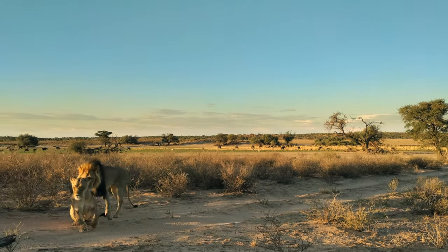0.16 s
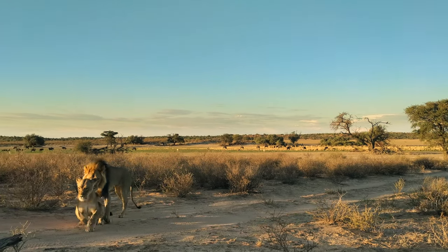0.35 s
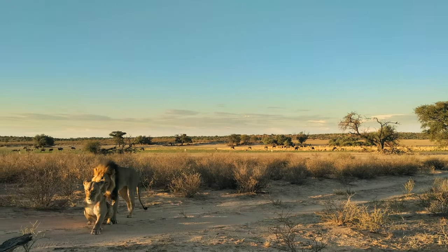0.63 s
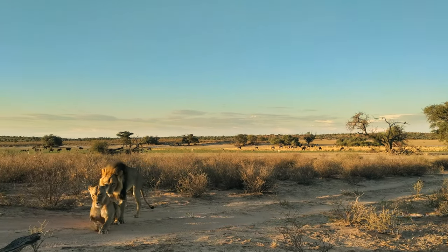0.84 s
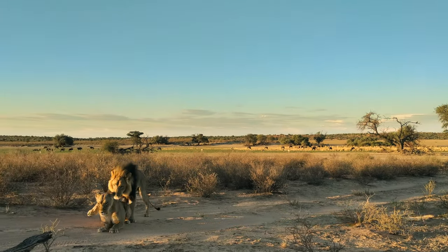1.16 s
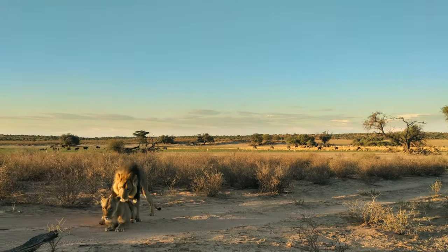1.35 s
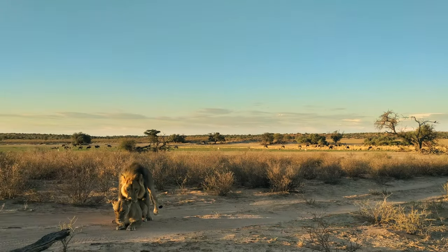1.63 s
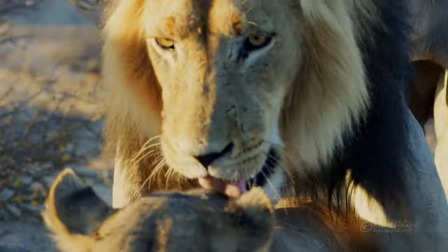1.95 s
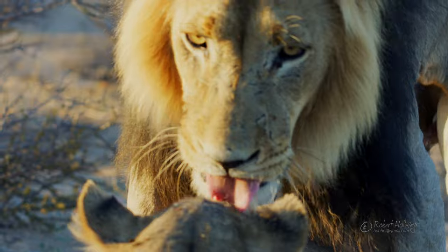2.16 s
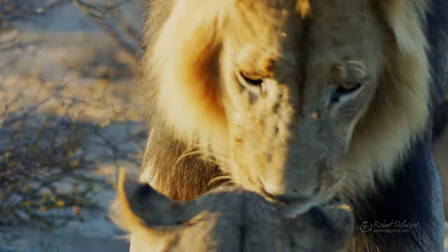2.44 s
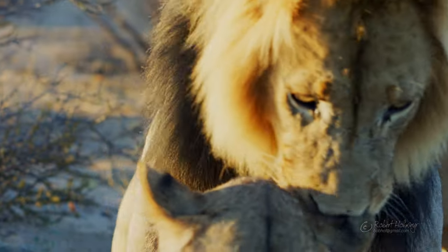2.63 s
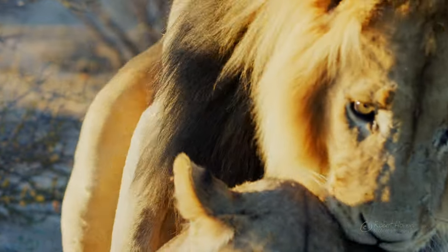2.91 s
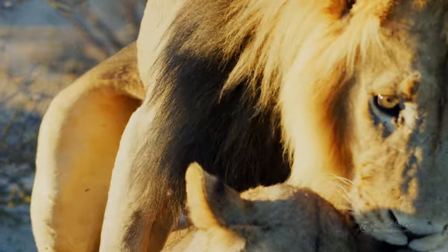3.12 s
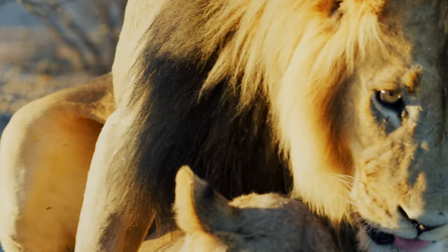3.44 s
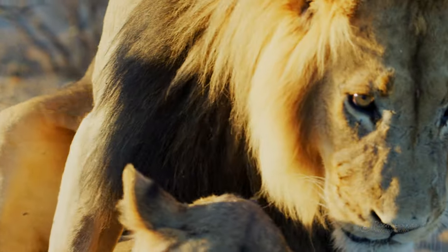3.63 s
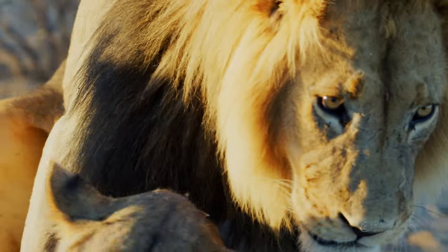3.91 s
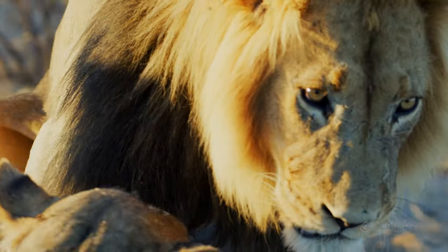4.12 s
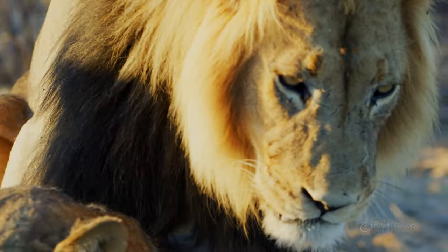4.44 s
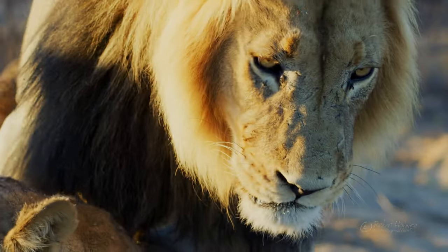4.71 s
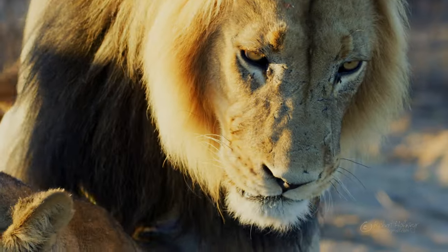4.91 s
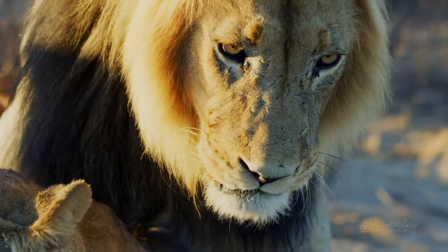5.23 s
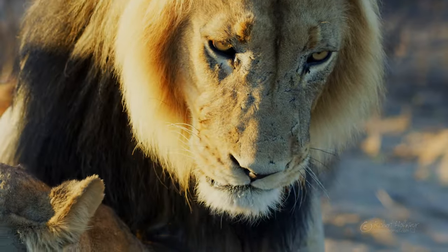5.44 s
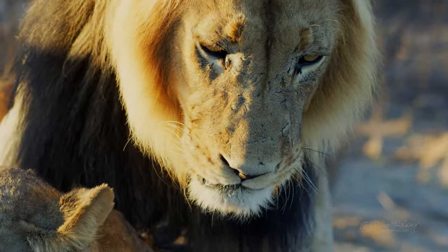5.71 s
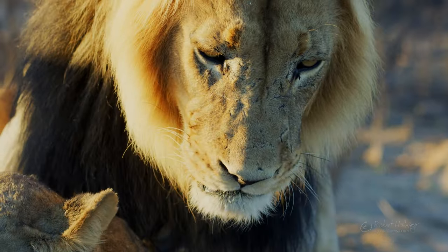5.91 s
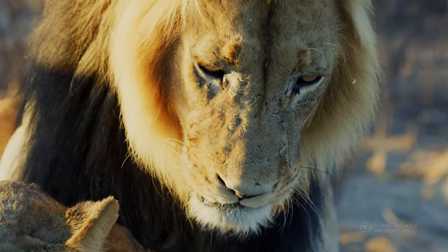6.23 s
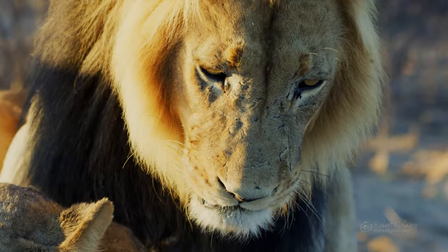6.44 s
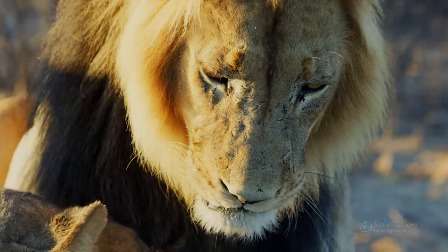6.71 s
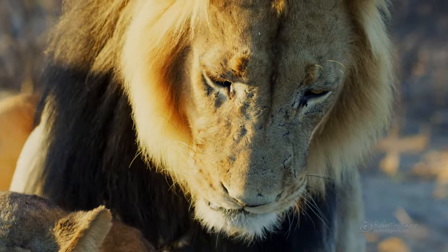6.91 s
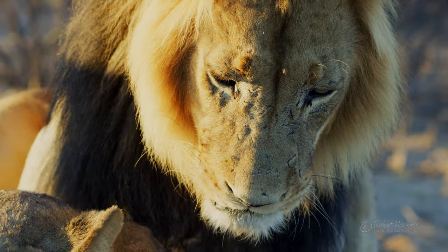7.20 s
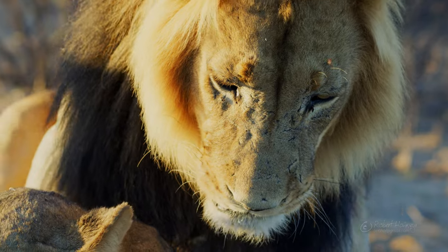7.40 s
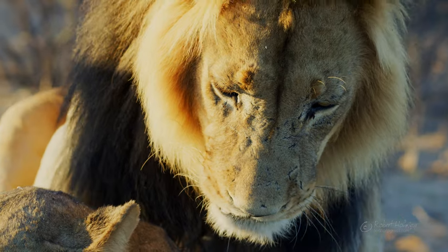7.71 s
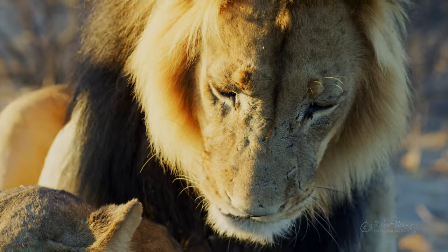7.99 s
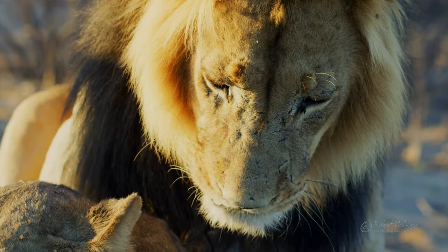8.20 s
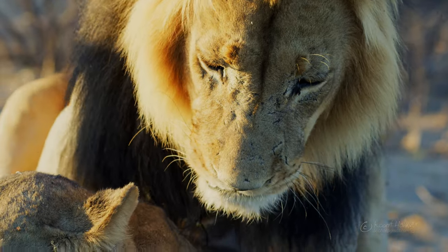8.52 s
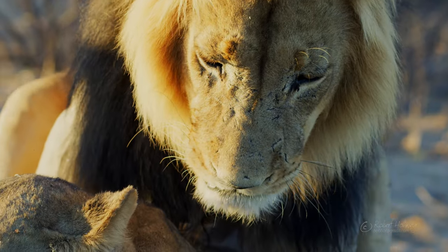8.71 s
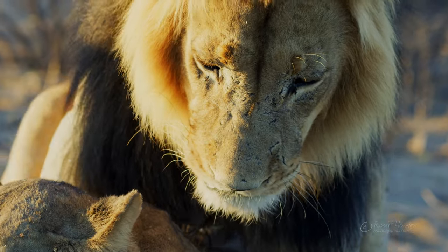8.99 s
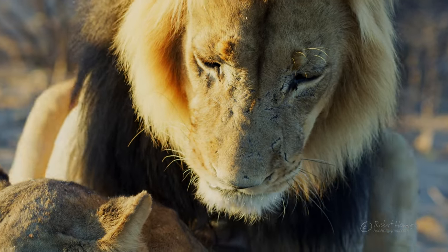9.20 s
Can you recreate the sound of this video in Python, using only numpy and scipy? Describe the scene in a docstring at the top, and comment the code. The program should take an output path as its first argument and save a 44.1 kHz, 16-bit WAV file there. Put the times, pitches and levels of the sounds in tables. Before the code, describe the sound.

A close stereo pickup of a lion growling in open scrub. Quiet rumble, a croaking rattle and small snaps lead in; then the growl starts with a nasal snarl and continues as a deep, rough, uneven purr-like rumble to the end. Quick bird chirps, falling whistles and harsh little notes scatter around it, with fainter chatter farther off and very soft air hiss.

```python
"""Lion growl and bird flock

A lion growls in dry open bush, a little right of centre: throat pulses and breath ring through throat,
nose and open mouth, over a deep chest rumble of lumpy noise; its last phrase repeats as a loop.
A flock of small birds whistles (gliding sines) and rasps (shaken sines) nearby, with chatter farther off.
A frog-like rattle and a few ticks (clicks in resonances) open the scene; faint banded hiss lies under all."""
import sys
import numpy as np
from scipy import signal
from scipy.io import wavfile

SR = 44100
rng = np.random.default_rng(int(sys.argv[2]) if len(sys.argv) > 2 else 0)


def int16_out(signal):
    """Quantize to a 16-bit WAV file."""
    q = np.round(np.clip(np.atleast_2d(signal).T, -1, 1) * 32767)
    wavfile.write(sys.argv[1], SR, q.astype(np.int16))


N = 412335

# Hiss colour: f/Hz, relative level per Hz/dB
AIR_COLOUR = [(15, -35), (25, -0.5), (101, -1.5), (314, -13.5), (685, -23), (897, -16.5), (1710, -21),
              (2240, -23.5), (8150, -24.5), (9320, -29), (12200, -26), (15600, -36)]
AIR_DB = -59.5
# Stereo width of the hiss: f/Hz, left-right likeness/1
AIR_LIKENESS = [(60, 1), (600, 0.67), (3000, 0.65), (8000, 0.24), (10800, 0.46), (11100, 1)]
# Dry snaps: t/s, strength/dB
TICKS = [(0.537, -26), (0.617, -16), (0.694, -12.5), (0.765, -20.5)]
# Rings of a snap: f/Hz, width/Hz, level/dB
TICK_MODES = [(1050, 430, -0.5), (2080, 450, 0.5), (5560, 570, -6.5)]
# Rings of the rattle: f/Hz, width/Hz, relative level/dB
RATTLE_MODES = [(1010, 210, 4), (2110, 330, -4)]
RATTLE_PER_S, RATTLE_LATE_PER_S = 40, 36.6  # clicks per second before and after the upper ring joins
UPPER_FROM_S, RATTLE_END_S, RATTLE_DB = .295, .525, -61.5

# Farther birds: t/s, level/dB
CHATTER = [(0, -73.5), (1.0, -69), (2.11, -60), (2.6, -64.5), (3.2, -54.5), (3.4, -73.5), (5.0, -59),
           (6.3, -73), (6.55, -63.5), (7.0, -75.5), (9.1, -64.5)]
# Grainy far-off trill: f/Hz, width/Hz, level/dB
TRILL = (2980, 520, -71)
# A run of evenly spaced short pips: level/dB of each
PIP_DB = [-60, -56, -58, -59, -62, -60]
PIP_FROM_S, PIP_EVERY_S, PIP_S, PIP_HZ = 1.415, .098, .018, 2550
HIGH_FROM_S, HIGH_S, HIGH_DB = 7.1, .68, -71  # a faint spell of high short chirps
# Harsh notes: t/s, length/s, start f/Hz, end f/Hz, level/dB
RASPS = [(1.118, 0.1, 5670, 3860, -60), (1.254, 0.039, 6840, 4700, -55), (1.275, 0.052, 4140, 3870, -52.5),
         (1.54, 0.096, 4180, 3950, -53.5), (4.876, 0.047, 3590, 3500, -51),
         (5.121, 0.08, 5330, 4360, -51.5), (5.334, 0.082, 6460, 3460, -50), (5.481, 0.037, 4230, 3420, -48),
         (5.581, 0.099, 6400, 4960, -53), (5.892, 0.075, 6780, 4460, -55.5),
         (6.476, 0.036, 4980, 4420, -57), (9.309, 0.018, 2700, 2300, -52.5)]
# Whistles of mixed shape, level, rising, dropping, dipping or arched:
# t/s, length/s, start f/Hz, middle f/Hz, end f/Hz, level/dB
NOTES = [(1.71, .11, 2700, 3650, 3300, -60), (1.733, .06, 5400, 5150, 4730, -62),
         (2.0, .115, 5200, 4650, 3600, -57), (2.14, .08, 6800, 6250, 5600, -56),
         (2.206, .035, 3400, 3560, 3060, -54), (2.52, .04, 2300, 1750, 2300, -60),
         (2.833, .141, 4160, 4130, 3440, -59), (2.845, .052, 2600, 2620, 3000, -44),
         (2.92, .034, 3800, 3000, 2790, -43), (2.955, .065, 2790, 2760, 2580, -50),
         (2.97, .045, 5750, 5700, 5450, -60), (3.1, .055, 2650, 2400, 2200, -47),
         (3.165, .025, 3250, 2900, 2450, -52), (3.196, .126, 2380, 2060, 1590, -55),
         (3.653, .077, 4110, 4330, 3780, -60), (3.685, .065, 2800, 2950, 3150, -57),
         (3.69, .06, 1400, 1500, 1700, -62), (3.865, .04, 2150, 2600, 3200, -57),
         (3.99, .1, 1900, 2700, 3400, -62), (4.065, .09, 5400, 4950, 4550, -61),
         (4.542, .057, 4200, 4410, 4490, -53), (4.706, .071, 2900, 3100, 3500, -54),
         (4.71, .07, 1350, 1500, 1750, -60), (4.89, .04, 2250, 2500, 3000, -55),
         (5.81, .07, 4250, 4350, 3900, -59), (6.09, .12, 5450, 4840, 4460, -63),
         (6.6, .08, 4100, 4500, 4100, -61), (6.66, .07, 1500, 2000, 2500, -61),
         (6.828, .03, 4300, 5250, 4500, -58), (6.885, .022, 4600, 4850, 4000, -59),
         (7.14, .1, 2050, 2900, 3450, -63), (7.89, .045, 2700, 2450, 1950, -63),
         (8.06, .085, 2800, 3800, 3500, -60), (8.541, .048, 2030, 2170, 2680, -51),
         (8.588, .039, 2650, 2490, 2210, -44), (8.64, .055, 1400, 1620, 1700, -60),
         (8.836, .016, 3150, 3100, 3000, -50), (8.88, .055, 1900, 2300, 2700, -60),
         (8.9, .12, 5000, 4450, 3300, -65), (8.929, .09, 2400, 2610, 2600, -43),
         (9.078, .028, 2450, 2480, 2300, -47), (9.125, .025, 1800, 2100, 2600, -55),
         (9.147, .038, 2660, 3000, 2540, -44), (9.185, .033, 2660, 2480, 2250, -48)]
# Whistles that rise and drop: crest t/s, crest f/Hz, rise/s, drop/s, level/dB
ARCHES = [(0.705, 3800, .055, .045, -63), (0.915, 2950, .02, .016, -63), (2.216, 7300, .01, .035, -59),
          (2.545, 3600, .033, .028, -57), (2.62, 4050, .075, .06, -56), (3.225, 4400, .045, .03, -51),
          (3.34, 3950, .06, .022, -57), (3.812, 5800, .025, .045, -53), (3.815, 4400, .058, .062, -51),
          (4.21, 3800, .058, .012, -57), (4.31, 3900, .055, .045, -58), (4.608, 4620, .01, .045, -53),
          (4.61, 3700, .04, .048, -56), (4.835, 5750, .025, .045, -50), (4.84, 4450, .08, .055, -49),
          (4.955, 3650, .045, .02, -54), (5.1, 3960, .057, .052, -49), (6.515, 3800, .065, .01, -58),
          (6.575, 4500, .04, .05, -54), (6.575, 5750, .015, .03, -61), (6.72, 4900, .05, .02, -62),
          (7.72, 3850, .05, .02, -65), (8.33, 4150, .035, .03, -56), (8.402, 4450, .048, .05, -60)]
ARCH_UP_HZ_PER_S, ARCH_DOWN_HZ_PER_S, ARCH_ROUND_S = 35000, 50000, .012
# Whistles that start high and drop: t/s, start f/Hz, end f/Hz, level/dB
FALLS = [(0.13, 5300, 2600, -68), (1.215, 5700, 3700, -65), (1.405, 4850, 2620, -60),
         (1.54, 5250, 2400, -53), (1.83, 5640, 3110, -53), (1.94, 5000, 2500, -53),
         (2.065, 5500, 2610, -56), (2.14, 5000, 3500, -60), (2.215, 5100, 3100, -50),
         (2.236, 5560, 3600, -49), (2.3, 4900, 3400, -59), (2.355, 5400, 3000, -54),
         (2.65, 4800, 2900, -60), (2.724, 4520, 2880, -56), (3.025, 6300, 3000, -57),
         (4.07, 5300, 2440, -56), (4.17, 5000, 3200, -60), (4.245, 5100, 2480, -52),
         (4.335, 5400, 3000, -60), (4.444, 5170, 2730, -59), (5.596, 3930, 2360, -57),
         (5.655, 5300, 2700, -58), (5.708, 4510, 2930, -58), (5.936, 5060, 4230, -55),
         (6.198, 5520, 2880, -54), (7.609, 4910, 2920, -62), (8.76, 5200, 3100, -63)]
FALL_HZ_PER_S, FALL_SAG_HZ = 35000, 260  # mean speed, and how far the middle hangs below a straight line
LEAD_S, LEAD_HZ, LEAD_DB = .054, 937, -15  # lead-in: length, extra height, level against its fall
HAZE_T60_S, HAZE_DB = .25, -15  # scatter of bird sound among the bushes

# Chest rumble: t/s, level/dB
RUMBLE = [(0, -63), (0.11, -46.5), (0.64, -43.5), (0.72, -52), (0.94, -57), (0.98, -44.5), (1.2, -58),
          (1.55, -42.5), (2.2, -39.5), (2.7, -40.5), (4.3, -41.5), (5.3, -37), (5.8, -42.5)]
# Chest resonances: f/Hz, width/Hz, relative level/dB
CHEST = [(104.5, 48.7, 5), (126.5, 17.5, 4.5), (183, 31, -7.5)]
SWELL_S, SWELL_TOP_S, SWELL_DB = .799, 3.053, 2.5  # rumble swell: period, time of one crest, depth
# Throat pulses: t/s, pulses per second/Hz
PACE = [(1.064, 22.3), (1.45, 22), (1.8, 23.8), (2.1, 23.4), (2.27, 24.05), (2.88, 24), (3.05, 23.4),
        (3.6, 22.8), (4.05, 22.15), (4.5, 22.4), (5.8, 22.2)]
# Growl effort: t/s, level/dB
EFFORT = [(1.05, -41.5), (1.27, -41), (1.55, -48.5), (1.88, -38), (2.6, -46.5), (2.95, -40.5), (5.51, -42),
          (5.75, -48)]
# Mouth shape: t/s, nasal ring level/dB, open snarl level/dB
MOUTH = [(1.07, -35, -8), (1.12, -3, -1.5), (1.3, 17, -4), (1.42, 7.5, -43), (1.7, -9, -10), (1.95, 0, -27),
         (3.0, 5.5, -20), (3.3, -7.5, -59), (4.9, -2, -14), (5.8, -4, -11.5)]
# Throat resonances: f/Hz, width/Hz, relative level/dB
THROAT = [(108.3, 36.4, 8.5), (132.2, 21.1, 13), (198.2, 22.8, 7.5), (278, 79, -10.5), (409, 49, -2),
          (471, 70, -8)]
# Nasal resonance: f/Hz, width/Hz, level before the mouth curve/dB
NASAL = (1410, 110, -21)
# Open-mouth resonances: f/Hz, width/Hz, level before the mouth curve/dB
SNARL = [(291, 125, 3), (483.5, 47, 3.5), (1270, 80, -7), (1870, 590, -19)]
HUM_ORDER, HUM_DB = 18, -14  # a partial of the pulses on the upper throat ring that hums on between slaps
LOOP_FROM_S, LOOP_S = 5.75, 3.32
CUTOFF_HZ = 15700


def from_db(db):
    """Gain of a level."""
    return 10 ** (np.asarray(db) / 20)


def rms_one(x):
    """Scale to unit rms."""
    return x / np.sqrt(np.mean(x ** 2) + 1e-20)


def in_time(rows):
    """Columns of a curve table, sample by sample."""
    s, *columns = np.transpose(rows)
    return [np.interp(np.arange(N) / SR, s, column) for column in columns]


def at_hz(points, hz):
    """Value of a spectrum table, read along log frequency."""
    table_hz, values = np.transpose(points)
    return np.interp(np.log(hz), np.log(table_hz), values)


def drift(rate_hz, size=N):
    """Slow chance: noise twice through a one-pole low-pass, scaled to unit rms."""
    warm_up = 9000
    r = np.exp(-2 * np.pi * rate_hz / SR)
    slow = signal.lfilter([1], [1, -2 * r, r * r], rng.standard_normal(size + warm_up))
    return rms_one(slow[warm_up:])


def resonate(x, hz, width_hz, level_db=0):
    """One resonance whose peak gain is level_db."""
    r = np.exp(-np.pi * width_hz / SR)
    zeros = [(1 - r * r) / 2, 0, (r * r - 1) / 2]
    poles = [1, -2 * r * np.cos(2 * np.pi * hz / SR), r * r]
    return from_db(level_db) * signal.lfilter(zeros, poles, x + 1e-18)


def twice(x, hz, width_hz, level_db):
    """Two stacked resonances, for steep skirts."""
    return resonate(resonate(x, hz, width_hz, level_db), hz, 1.25 * width_hz)


def pulses(per_s, jitter, shimmer_db):
    """One click per cycle of a wavering rate, and the phase within the cycle."""
    cycles = np.cumsum(per_s) / SR + (per_s > 0) + jitter * drift(12.9)
    # the running maximum keeps a backward waver from clicking twice
    clicks = np.diff(np.floor(np.maximum.accumulate(cycles)), prepend=0)
    return clicks * from_db(shimmer_db * drift(15)), cycles % 1


def add(out, s, hz, level_db, shape):
    """A sine that follows the pitch track hz from time s, mixed into out."""
    i = int(s * SR)
    turn = 2 * np.pi * np.cumsum(hz) / SR
    out[i:i + len(hz)] += (from_db(level_db) * shape * np.sin(turn))[:N - i]


def whistles(notes):
    """Near-pure glides along a parabola through three pitches, with a slight level tremor."""
    out = np.zeros(N)
    for s, length, start, middle, end, level_db in notes:
        u = np.linspace(-.06, 1.06, int(1.12 * length * SR))  # overshoots the note for the fades
        parabola = np.polyfit([0, .5, 1], [start, middle, end], 2)
        shape = signal.windows.tukey(len(u), .45)
        add(out, s - .051 * length, np.polyval(parabola, u), level_db, shape)
    return out * from_db(3.2 * drift(90))


def air():
    """Faint hiss: third-octave bands of stereo noise, each with its own level and likeness."""
    out, edges = 0, 22 * 2 ** np.arange(0, 9.7, 1 / 3)
    white = rng.standard_normal((2, 2, N))  # neighbouring bands take turns on two noise pairs
    for k, (low, high) in enumerate(zip(edges, edges[1:])):
        band = signal.butter(2, [low, high], "band", fs=SR, output="sos")
        mid, side = signal.sosfilt(band, white[k % 2])
        hz = np.sqrt(low * high)
        alike = np.clip(at_hz(AIR_LIKENESS, hz), -1, 1)
        stereo = np.sqrt(1 + alike) * mid + np.sqrt(1 - alike) * side * [[1], [-1]]
        out = out + from_db(at_hz(AIR_COLOUR, hz)) * stereo
    return from_db(AIR_DB) * rms_one(out)


def ticks():
    """Small dry snaps: single clicks that excite short rings."""
    clicks = np.zeros(N)
    for s, strength_db in TICKS:
        clicks[int(s * SR)] = from_db(strength_db)
    return sum(twice(clicks, *mode) for mode in TICK_MODES)


def rattle():
    """A near-steady click train with a noisy puff after each click, in two rings."""
    t = np.arange(N) / SR
    per_s = np.where(t < UPPER_FROM_S, RATTLE_PER_S, RATTLE_LATE_PER_S)
    clicks, phase = pulses(per_s, jitter=.015, shimmer_db=1.2)
    puff_db = 5.5 * np.cos(2 * np.pi * (phase - .15))
    puffs = rms_one(rng.standard_normal(N) * from_db(puff_db))
    source = rms_one(np.roll(clicks, 90)) + 1.1 * puffs
    low, upper = [twice(source * (t < RATTLE_END_S), *mode) for mode in RATTLE_MODES]
    upper = upper * (t > UPPER_FROM_S)
    return from_db(RATTLE_DB) * (low + upper) / np.std(low[t < RATTLE_END_S])


def chatter():
    """Many faint random glides, falling or arched, all dropping at the end, over a grainy trill that swells in."""
    draw = rng.random((1200, 6))
    start_s, length_s = .013 + 9.2 * draw[:, 0], .016 + .06 * draw[:, 2]
    middle = 2700 * 1.9 ** draw[:, 1] ** 1.5
    start = middle * (.68 + .65 * draw[:, 3])
    end = middle * (.384 + .5 * draw[:, 5])
    glides = whistles(np.transpose([start_s, length_s, start, middle, end, 9 * draw[:, 4]]))
    hz, width_hz, trill_db = TRILL
    grains = rng.standard_normal(N) * from_db(6 * drift(18))
    trill = rms_one(twice(grains, hz, width_hz, 0))
    swell_in = np.clip(np.arange(N) / SR / 4.5, .2, 1)
    return from_db(in_time(CHATTER)[0]) * rms_one(glides) + from_db(trill_db) * trill * swell_in


def small_calls():
    """Short whistles: the even, level pips and the scattered, falling high chirps."""
    pips = [(PIP_FROM_S + k * PIP_EVERY_S, PIP_S, PIP_HZ, PIP_HZ, PIP_HZ, db) for k, db in enumerate(PIP_DB)]
    chirps = []
    for k, (when, hz) in enumerate(rng.uniform([0, 6400], [1, 7700], (14, 2))):
        s = HIGH_FROM_S + HIGH_S * (k + when) / 14
        chirps.append((s, .022, hz + 400, hz, hz - 400, HIGH_DB))
    return whistles(pips + chirps)


def rasps():
    """Falling notes whose pitch is shaken fast and wide, which roughens the tone."""
    out = np.zeros(N)
    for s, length, start, end, level_db in RASPS:
        size = int(1.3 * length * SR)  # room for the fades
        hz = np.linspace(start, end, size) + 550 * drift(333, size=size)
        shape = np.sqrt(np.hanning(size)) * from_db(2.5 * drift(90, size=size))
        add(out, s - .15 * length, hz, level_db, shape)
    return out


def arches():
    """Whistles with a straight rise, a rounded crest and a steeper drop."""
    out = np.zeros(N)
    for s, crest_hz, rise, drop, level_db in ARCHES:
        t = np.arange(-rise, drop, 1 / SR)
        speed = np.where(t < 0, ARCH_UP_HZ_PER_S, ARCH_DOWN_HZ_PER_S)
        hz = crest_hz - speed * (np.hypot(t, ARCH_ROUND_S) - ARCH_ROUND_S)
        add(out, s - rise, hz, level_db, signal.windows.tukey(len(t), .4))
    return out * from_db(3 * drift(90))


def falls():
    """Whistles that tip over slowly from a fainter, higher start, then all drop at the same mean speed."""
    drops, leads = [], []
    for s, high, low, db in FALLS:
        drops.append((s, (high - low) / FALL_HZ_PER_S, high, (high + low) / 2 - FALL_SAG_HZ, low, db))
        leads.append((s - LEAD_S, LEAD_S, high + LEAD_HZ, high + .62 * LEAD_HZ, high, db + LEAD_DB))
    return whistles(drops + leads)


def haze(x):
    """Bird sound scattered among the bushes: a dense dying noise tail, partly different on each side."""
    t = np.arange(int(.6 * SR)) / SR
    shared, left, right = rng.standard_normal((3, len(t))) * from_db(-60 * t / HAZE_T60_S)
    tails = np.array([shared + .17 * left, shared + .96 * right])
    tails = tails / np.sqrt(np.sum(tails[0] ** 2))
    return from_db(HAZE_DB) * signal.fftconvolve(x[None], tails, axes=1)[:, :N]


def place(x, left_db, lag_s, echo_db, seconds):
    """Ground and bushes send each side its own echoes; left_db and lag_s set the left side back."""
    out = np.array([np.roll(x, int(lag_s * SR)), x])
    lags = (rng.uniform(.1, 1, 12) * seconds * SR).astype(int)
    for k, lag in enumerate(lags):
        out[k % 2, lag:] += from_db(echo_db) * (-1) ** (k // 2) * x[:-lag]
    return out * from_db([[left_db], [0]])


def rumble():
    """Irregular flutter in the chest: lumpy noise in low resonances, swelling evenly once the growl runs."""
    t = np.arange(N) / SR
    swell = np.cos(2 * np.pi * (t - SWELL_TOP_S) / SWELL_S)
    swell_db = SWELL_DB * swell * np.clip(t - PACE[0][0], 0, 1)
    lumpy = rng.standard_normal(N) * from_db(2.68 * drift(11.7))
    chest = rms_one(sum(twice(lumpy, *mode) for mode in CHEST))
    return from_db(in_time(RUMBLE)[0] + swell_db) * chest


def growl():
    """Slack vocal folds slap shut, breath noise swells with each slap; returns throat and nose-mouth rasp."""
    nasal_db, snarl_db = in_time(MOUTH)
    started = np.arange(N) > PACE[0][0] * SR
    clicks, phase = pulses(started * in_time(PACE)[0], jitter=.012, shimmer_db=2.5)
    clicks = rms_one(clicks)
    slaps = clicks + .35 * np.roll(clicks, int(.017 * SR))  # a weaker second closure in each cycle
    breath = rms_one(rng.standard_normal(N) * from_db(5 * np.cos(2 * np.pi * phase)))

    source = started * (slaps + .5 * breath)
    throat = sum((-1) ** k * resonate(source, *mode) for k, mode in enumerate(THROAT))
    throat = signal.sosfilt(signal.butter(4, [60, 540], "band", fs=SR, output="sos"), throat)
    hum = from_db(HUM_DB + 3 * drift(3)) * np.sin(2 * np.pi * HUM_ORDER * phase)
    throat = throat + started * np.std(throat) * hum

    airy = started * (.53 * slaps + breath)
    nasal = from_db(nasal_db) * twice(airy, *NASAL)
    snarl = from_db(snarl_db) * sum(twice(airy, *mode) for mode in SNARL)
    return from_db(in_time(EFFORT)[0]) * np.array([throat, nasal + snarl]) / np.std(throat)


def looped(x):
    """From the loop point on, after a short cross-fade, the last phrase plays again and again."""
    start, lag, fade = int(LOOP_FROM_S * SR), int(LOOP_S * SR), 2000
    share = np.clip((np.arange(N) - start + fade) / fade, 0, 1)
    out = np.sqrt(1 - share) * x + np.sqrt(share) * np.roll(x, lag, axis=1)
    out[:, start + lag - fade:] = out[:, start - fade:N - lag]  # next round, cross-fade included
    return out


def scene():
    """Mix of hiss, ticks, rattle, birds and the looped lion."""
    far = chatter()
    calls = small_calls() + rasps() + whistles(NOTES) + arches() + falls()
    birds = place(calls + .95 * far, left_db=-1, lag_s=0, echo_db=-24, seconds=.05)
    birds = birds + haze(calls + 2.6 * far)
    throat, rasp = growl()
    lion = place(rumble(), left_db=-1.2, lag_s=0, echo_db=-19, seconds=.034)
    lion = lion + place(throat, left_db=-7, lag_s=.0003, echo_db=-15, seconds=.045)
    lion = lion + place(rasp, left_db=-7, lag_s=0, echo_db=-15, seconds=.045)
    return air() + ticks() + rattle() + birds + looped(lion)


def record(dry):
    """A steep low-pass cuts the top."""
    return signal.sosfilt(signal.ellip(12, .5, 80, CUTOFF_HZ, fs=SR, output="sos"), dry)


dry = scene()
out = record(dry)
int16_out(out)
```